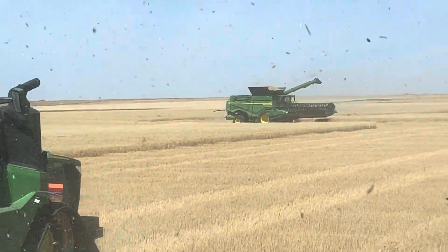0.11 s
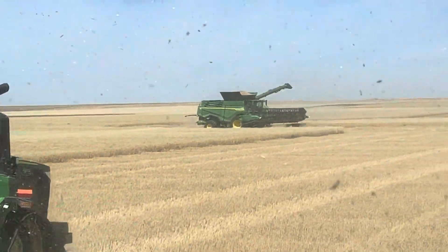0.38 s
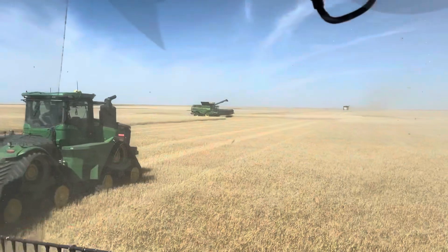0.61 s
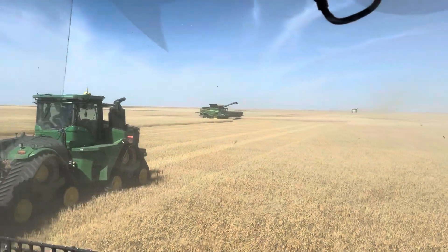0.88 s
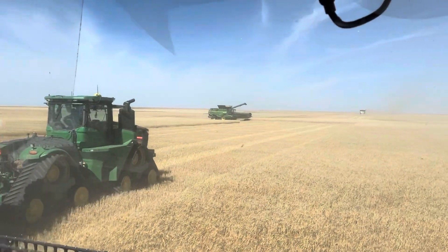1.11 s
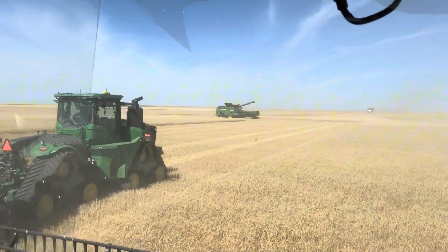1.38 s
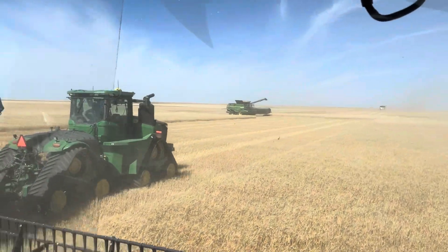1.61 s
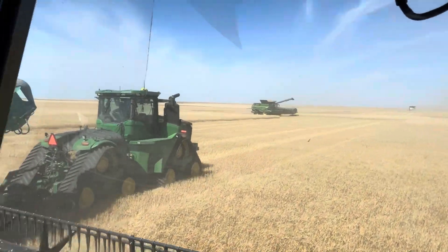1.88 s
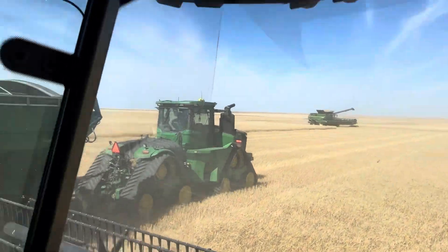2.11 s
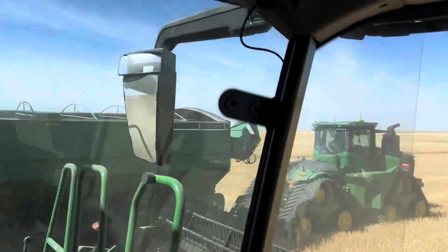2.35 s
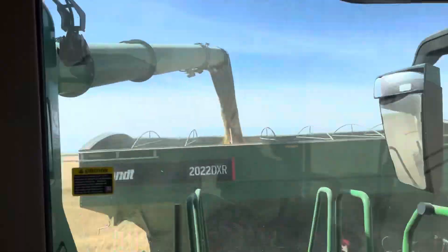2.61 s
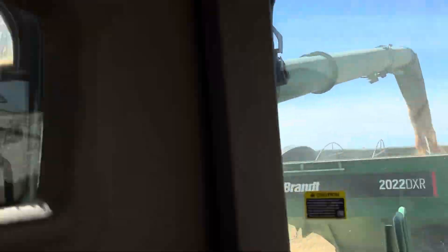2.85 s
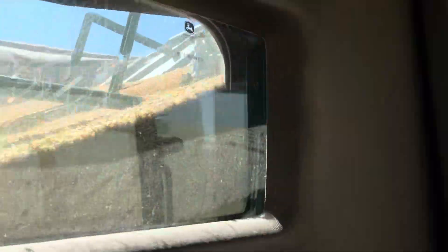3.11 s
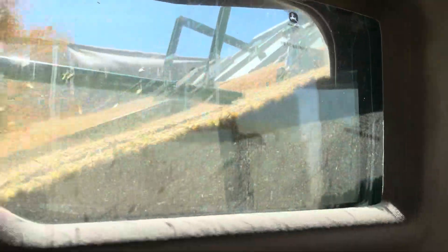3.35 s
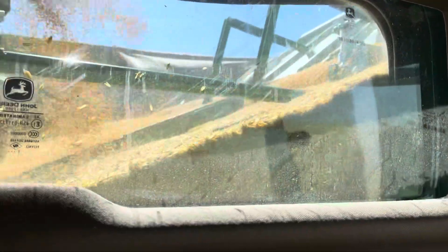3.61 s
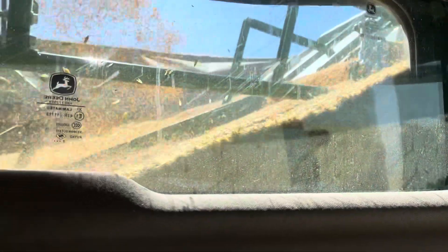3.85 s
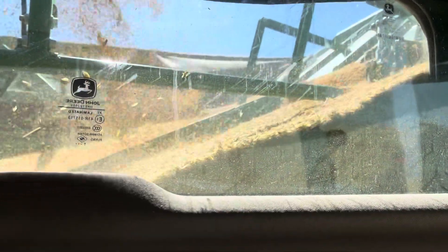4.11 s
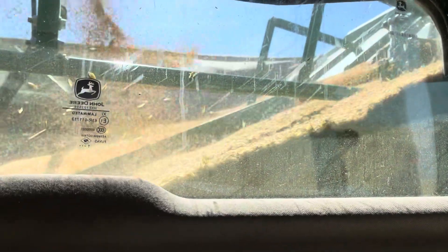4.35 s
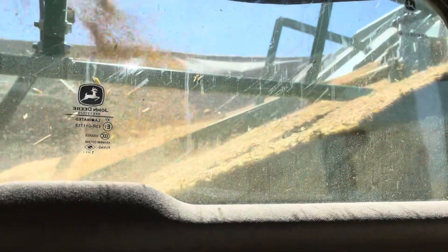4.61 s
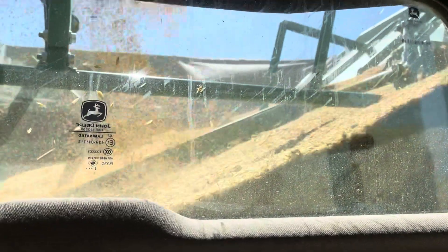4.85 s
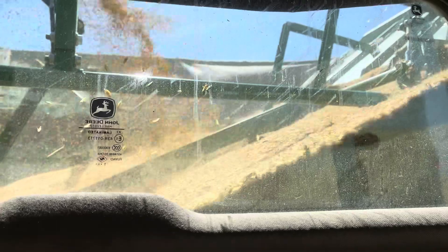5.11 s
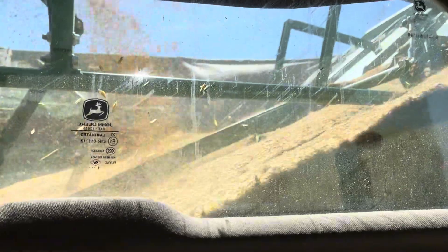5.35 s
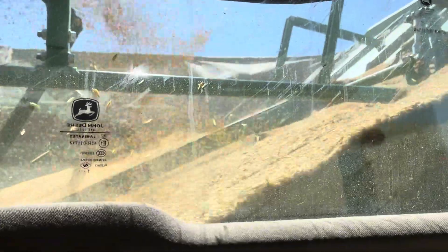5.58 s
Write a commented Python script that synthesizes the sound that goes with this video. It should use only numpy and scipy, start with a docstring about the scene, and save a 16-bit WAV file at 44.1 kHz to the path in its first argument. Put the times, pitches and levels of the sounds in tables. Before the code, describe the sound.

The interior of a closed harvester cab at constant engine speed, close and muffled, heard by a handheld stereo microphone. A deep steady hum near 95 Hz dips briefly about twice a second, among other low shaft and pump tones, faint wavering gear whine, dense threshing rumble and soft, dark hiss. At about 0.4 s there is one dry tick, stronger on the left. Light hand rubs follow around 0.5, 1.1, 1.5 and 1.8-1.9 s, with soft dull knocks at 1.5-1.6 and 1.8 s. From 2 to 3.2 s the microphone turns from windscreen to rear window: a hollow, airy rush swells at the side, rising in pitch, then subsides. The rumble settles into a boomier colour, its lows thinning for instants. At 3.9 s a tiny, high, stuttering squeak sounds on the right; at 4.2 s, a short rub and knocks. The drone continues unchanged to the end, about 5.7 s.

```python
"""Inside the closed cab of a harvester at constant engine speed, heard by a hand-held microphone pair.
From the start, steady sines (firing tone, shafts, pumps, gears) stand in noise bands shaped by the cab; the firing
tone dips about twice a second. Near 0.4 s the waveform steps once, a dry tick; then come rubs (short noise swells)
and soft knocks (dying sines). From 2 to 3.2 s the pair turns from windscreen to rear window past a rush of noise at
the side; from then on the lows thin briefly now and then. Near 3.9 s a squeak of tiny slips, near 4.2 s a rub and knocks."""
import sys
import numpy as np
from scipy import signal
from scipy.fft import rfft, irfft
from scipy.io import wavfile

SR = 44100
rng = np.random.default_rng(int(sys.argv[2]) if len(sys.argv) > 2 else 0)


def makeup_ratio(level_db):
    """Linear amplitude ratio for a level in decibels (20 dB per factor of ten)."""
    decades = np.asarray(level_db, float) / 20
    return 10 ** decades


def materialize(psi):
    """Save the field psi as 16-bit PCM at rate SR to the path in sys.argv[1].

    A 1-D psi becomes a single channel; in a 2-D psi each row is a channel.
    """
    bounded = np.clip(np.atleast_2d(psi).T, -1, 1)
    quanta = np.round(bounded * 32767).astype(np.int16)
    wavfile.write(sys.argv[1], SR, quanta)


N = 252252
T = np.arange(N) / SR   # time in s
JUMP_S = .4358   # when the waveform steps and the noise balance changes


def panned(pan_db):
    """Left and right gains, pan_db apart, of mean power 1."""
    left = makeup_ratio(pan_db / 2)
    return np.array([left, 1 / left]) / np.sqrt((left ** 2 + left ** -2) / 2)


def bump(centre_s, half_length_s):
    """A smooth rise to 1 and back, used for anything that comes and goes."""
    return np.exp(-((T - centre_s) / half_length_s) ** 2)


def drift(rate_hz):
    """Slow chance of spread 1: white noise twice through a one-pole low-pass, one value every 64 samples."""
    r = np.exp(-2 * np.pi * rate_hz * 64 / SR)
    white = rng.standard_normal(N // 64 + 3002)
    slow = signal.lfilter([1], [1, -2 * r, r * r], white)[3000:]   # the filter has settled by then
    return np.interp(np.arange(N) / 64, np.arange(len(slow)), slow / slow.std())


def turned(row, facing):
    """Blend a row's three values for ahead into its three for behind."""
    return [ahead + (behind - ahead) * facing for ahead, behind in zip(row[1:4], row[4:7])]


def halfway(facing):
    """How far the pair points sideways: 0 ahead and behind, 1 midway."""
    return 4 * facing * (1 - facing)


def gliding_noise(hz, width_hz):
    """Low-passed noise shifted up to a moving centre pitch; rms 1."""
    low = signal.butter(2, width_hz / 2, fs=SR, output="sos")
    a, b = signal.sosfilt(low, rng.standard_normal((2, N)))
    phase = 2 * np.pi * np.cumsum(hz) / SR
    noise = a * np.cos(phase) + b * np.sin(phase)
    return noise / noise.std()


def tone(hz, gains, lead):
    """A sine with left and right rms gains, its phase on the left ahead of the right by lead (rad)."""
    phase = 2 * np.pi * (hz * T + rng.random())
    return np.sqrt(2) * gains * np.sin([phase + lead / 2, phase - lead / 2])


def firing(facing):
    """The engine's firing tone in the standing wave of the cab; each dip takes the same amount from both sides."""
    # rows for ahead, sideways, behind: left_db (rms before dips), right_db (same), left_lead_rad
    standing_wave = [(-16.5, -22, -0.064), (-12, -13, 0.15), (-21, -14.5, 0.44)]
    # short dips of the tone: centre_s, half_length_s, taken_db (rms amplitude subtracted)
    dips = [(0.244, 0.071, -21.5), (0.746, 0.29, -25), (1.322, 0.13, -19), (1.988, 0.16, -26.5),
            (2.61, 0.14, -20), (3.255, 0.14, -23.5), (3.837, 0.25, -21.5), (4.272, 0.16, -28),
            (4.87, 0.14, -23.5), (5.295, 0.29, -21.5)]
    left_db, right_db, lead = (np.interp(facing, [0, .5, 1], column) for column in np.transpose(standing_wave))
    taken = sum(makeup_ratio(db) * bump(s, length) for s, length, db in dips)
    return tone(94.9, makeup_ratio(np.array([left_db, right_db])) - taken, lead)


def machinery(facing):
    """Constant engine speed keeps every tone's pitch; levels waver, with a faster waver added to high gear tones."""
    # shafts, pumps, gear mesh: pitch_hz, ahead: level_db (mid-waver rms), left_minus_right_db, left_lead_rad,
    # behind: the same three, sideways_db (added midway through the turn)
    tones = [(61.1, -31, 1, 0.3, -29, 2, -0.5, 0), (75.5, -37, 3, 0, -37, -2, 0.3, 0),
             (110.7, -35, 4, 0.4, -29.5, 1, -0.1, 2), (122.3, -41, 4, 0.4, -33, 1, -0.1, -2),
             (163.0, -42, -1, -0.1, -39, 3, 0.5, -2), (190.0, -39, 3, -0.0, -39, -2, 1.0, 1),
             (212.6, -43, 0, 0.2, -43, 1, 0.4, -10), (229, -42, 1, 0.2, -52, 0, 0.3, -8),
             (245.4, -37.5, 2, 0.3, -41, 0, 0.3, -10), (376.1, -39, 2, -0.2, -41, 9, 0.5, -2),
             (417.9, -40, -1, -0.3, -41, 2, 0.8, -3), (490.8, -54, 1, 0.0, -56, -1, 0.1, -2),
             (613.5, -58, -7, -2.8, -54, -5, -1.1, 0), (622.1, -48, -9, 1.7, -44, 4, -1.0, -3),
             (639.3, -65, 7, -1.0, -59, 11, -1.4, -9), (752.1, -55, -8, -0.2, -55, 5, 3.0, -9),
             (769.5, -56, 17, -2.1, -61, 4, -1.9, 0), (895.7, -62, 10, -0.3, -59, 7, -1.2, -8),
             (933.1, -61, 4, -2.4, -53, 3, 3.0, 4), (981.5, -65, 5, 2.1, -58, 10, 2.5, 2),
             (1227.8, -58, -4, 2.7, -63, -2, 0.8, 2), (1244.9, -57, 4, 1.7, -66, -4, 2.7, 0),
             (1686.5, -66, 1, -2.4, -64, -1, 2.4, -5), (1097, -64, -3, 0, -62, 0, 3, 2)]
    # tones that swell or fade for a moment: centre_s, half_length_s, pitch_hz (of the tone), added_db
    tone_swells = [(.43, .08, 229, 12), (.7, .35, 245.4, 4), (1.55, .1, 229, 10), (3.15, .35, 110.7, 8),
                   (3.15, .25, 122.3, 7), (4.2, .25, 122.3, 10), (4.5, .35, 110.7, 8),
                   (5.58, .15, 110.7, 7), (5.58, .2, 122.3, 10), (2.0, .6, 622.1, -9),
                   (2.85, .4, 376.1, -6), (2.5, .06, 1227.8, 7), (2.7, .1, 1244.9, 6), (2.47, .04, 1097, 8),
                   (2.16, .04, 1097, 7)]
    out = firing(facing)
    for row in tones:
        hz, sideways_db = row[0], row[7]
        level_db, pan_db, lead = turned(row, facing)
        gear_db = 3 * np.clip((hz - 650) / 400, 0, 1)
        surge_db = 1.8 if 100 < hz < 450 else 1.1   # low tones surge more
        waver_db = surge_db * drift(3.3) + gear_db * drift(6.8)
        waver_db -= np.log(10) / 20 * gear_db ** 2   # offsets the mean power that the gear waver adds
        swell_db = sum(db * bump(s, length) for s, length, pitch, db in tone_swells if pitch == hz)
        level_db = level_db + swell_db + sideways_db * halfway(facing) + waver_db
        out += tone(hz, makeup_ratio(level_db) * panned(pan_db), lead)
    return out


def cab_noise(facing):
    """Overlapping bands of noise, one a table row, each with its level, side, likeness and flutter."""
    # threshing rumble through the cab: pitch_hz, ahead: level_db (per Hz, before swells and flutter),
    # left_minus_right_db, likeness (of the two sides, -1 to 1), behind: the same three
    rumble = [(25, -57.5, 1.5, 0.96, -60.5, 3.5, 0.91), (38.3, -54, -1, 0.98, -42.5, 0.5, 0.98),
              (50.4, -40.5, -2.5, 0.93, -50, 0, 0.84), (61.3, -43, 3, 0.85, -44, -2, 0.73),
              (80, -45, 1, 0.94, -44, 5.5, 1), (90.4, -41.5, 6.5, 0.96, -58, -6.5, 0.93),
              (100.1, -37.5, 0, 1, -40.5, 2.5, 0.63), (108.2, -47.5, -1, 0.84, -33.5, 3, 0.91),
              (129, -51, 6, 0.84, -44, -4.5, 1), (152.7, -51, 5, 0.5, -44.5, 4.5, 0.82),
              (187.8, -54.5, 2, 0.96, -48, 3.5, 0.77), (231.5, -48.5, 0, 1, -50, -1.5, 0.7),
              (294.6, -57, 3, 0.73, -57.5, 3.5, 0.74), (385, -54.5, 1.5, 0.91, -59.5, -2.5, 0.32),
              (454.5, -57.5, -0.5, 0.55, -60.5, 0, 0.62), (550, -66, 3, 0.99, -63, 8, 0.39)]
    # hiss above the rumble, in the top rows often nearly alike or opposite on the two sides: same columns and units
    hiss = [(695, -69, -0.5, 0.31, -69.5, -2.5, -0.56), (843, -71, 1.5, 0.26, -68, 1.5, -0.71),
            (1035, -71, 6, 0.22, -73.5, 2, -0.38), (1273, -74, 0.5, -0.35, -73, -3, -0.28),
            (1472, -74.5, -0.5, -0.49, -76, -5, -0.39), (1730, -77, 3.5, -0.16, -77, -1.5, -0.42),
            (2110, -81.5, 0.5, 0.7, -80.5, -1.5, 0.46), (2470, -83.5, 0, 0.78, -85.5, -2, 0.77),
            (3490, -87, -3, 0.73, -90.5, -1.5, 0.32), (4280, -88.5, -2.5, 0.68, -90, -7.5, 0.28),
            (5020, -93, -4, 0.78, -92, -8.5, 0.059), (5580, -92.5, -0.5, -0.55, -93.5, -5.5, -0.27),
            (7000, -94.5, -4, -0.71, -98.5, 1, -0.5), (7730, -95.5, 3.5, 0.89, -98, 0, 0.92),
            (10140, -99, -4, 0.94, -101, 0.5, 0.74), (10720, -100, 1, 0.37, -103, -0.5, 0.81),
            (11800, -101, -4, -0.99, -104, -1.5, -1.0), (13500, -106, 1, -1.0, -111, -1.5, -0.9),
            (14500, -108, 0.5, 0.81, -115, -5, 0.78), (15600, -114, -0.5, 0.77, -114, 0.5, 0.93)]
    # phase by which noise is ahead on the left: pitch_hz, lead_rad
    noise_lead = [(500, 0.1), (700, -0.9), (900, 0.2), (1250, -1), (1900, -0.3), (2100, 0.3), (2900, -0.8),
                  (5000, -0.9), (5500, -0.4), (7200, 0.4), (7600, 0)]
    # dB added to boom, rumble, low, middle and high hiss: before the jump, then midway through the turn
    before_jump_db = [2.5, 0, -2, 1.5, -1]
    sideways_db = [1.3, -2.5, 0.4, 0.15, 1.3]
    split_hz = [140, 620, 1700, 3800]   # borders of those five parts
    flutter_db = [0.23, 0.93, 0.95, 1.0, 1.0]   # scale of the random level changes in each part

    table = np.array(rumble + hiss)
    log_hz = np.log(np.fft.rfftfreq(N, 1 / SR) + 1)
    swells = np.outer(before_jump_db, T < JUMP_S) + np.outer(sideways_db, halfway(facing))
    shared = drift(8.0)
    out = np.zeros((2, N))
    for k, row in enumerate(table):
        # neighbours cross over in power
        share = np.interp(log_hz, np.log(table[:, 0]), np.arange(len(table)) == k)
        white = rng.standard_normal((2, len(log_hz))) + 1j * rng.standard_normal((2, len(log_hz)))
        mid, side = irfft(white * np.sqrt(share * N * SR / 8), N)
        level_db, pan_db, alike = turned(row, facing)
        alike = np.clip(alike, -1, 1)
        part = np.searchsorted(split_hz, row[0])
        level_db = level_db + swells[part] + flutter_db[part] * (0.45 * shared + drift(10.2))
        mid, side = np.sqrt(1 + alike) * mid, np.sqrt(1 - alike) * side
        out += makeup_ratio(level_db) * panned(pan_db) * [mid + side, mid - side]
    lead_hz, lead_rad = np.transpose(noise_lead)
    lead = np.interp(log_hz, np.log(lead_hz), lead_rad)
    return irfft(rfft(out) * np.exp(.5j * np.outer([1, -1], lead)), N)


def panels(facing):
    """Panels and glass ring on the noise: narrow bands that change with facing; the sides grow unlike with pitch."""
    # ringing parts: pitch_hz, width_hz, ahead_db (rms), sideways_db (rms), behind_db (rms), left_minus_right_db
    ringing = [(229, 20, -39.5, -54.5, -43.5, -1), (292, 36, -45, -53.5, -57.5, -4),
               (398, 22, -43, -46.5, -45.5, 8.5), (536.5, 30, -49, -57.5, -48.5, -1.5),
               (605, 26, -51.5, -61, -60, -3), (764, 44, -53.5, -60, -61.5, 5),
               (932, 41, -53, -58.5, -57.5, -3.5), (1090, 45, -61, -54, -64, -4.5),
               (1234, 44, -59, -48.5, -68.5, -3), (1328, 15, -67, -58.5, -71, -7),
               (1454, 42, -69, -58, -57, -6.5), (2204, 53, -59.5, -63, -71, -1)]
    # stages of the turn (0 to 1): ahead, sideways from, sideways to, behind
    stages = [.08, .3, .72, .92]
    out = np.zeros((2, N))
    for hz, width_hz, ahead_db, sideways_db, behind_db, pan_db in ringing:
        level_db = np.interp(facing, stages, [ahead_db, sideways_db, sideways_db, behind_db])
        mid, side = (gliding_noise(np.full(N, hz), width_hz) for k in range(2))
        apart = min(hz / 900, 1)
        sides = np.array([mid + apart * side, mid - apart * side]) / np.hypot(1, apart)
        out += makeup_ratio(level_db) * panned(pan_db)[:, None] * sides
    return out


def cancelled(noise, facing):
    """The cab cancels noise in narrow valleys between its resonances; their depth changes as the pair turns."""
    # valleys: pitch_hz, half_width_hz, ahead_db, behind_db (above 0 counts as no valley)
    valleys = [(85, 5, -2, 0.5), (202, 3.4, 0.5, 0), (269, 7.4, -3, 3), (360, 6.4, -5, -0.5),
               (457, 35, -2, -1), (585, 11, -7, -2)]
    hz, spectrum = np.fft.rfftfreq(N, 1 / SR), rfft(noise)

    def carved(column):
        cut_db = sum(np.minimum(row[column], 0) * np.exp(-((hz - row[0]) / row[1]) ** 2) for row in valleys)
        return irfft(spectrum * makeup_ratio(cut_db), N)

    ahead, behind = carved(2), carved(3)
    return ahead + (behind - ahead) * facing


def side_rush(facing):
    """One noise resonance, partly shared by both sides, rises in pitch with the turn and swells at the side window."""
    hz = np.interp(facing, [0.07, .65], [1084, 1468])
    start_s, attack_s, hold_s, release_s = 2.02, .4, 0.45, .22
    full_db, range_db = -52.5, 14.5   # rms of the shared part at full swell; how far it lies lower otherwise
    corners = start_s + np.cumsum([0, attack_s, hold_s, release_s])
    level_db = full_db + np.interp(T, corners, [-range_db, 0, 0, -range_db])
    both, left, right = (gliding_noise(hz, width_hz=100) for k in range(3))
    return makeup_ratio(level_db) * np.array([both + 0.78 * left, both + 0.67 * right])


def lows_thinned(sound):
    """The lows thin briefly, as when low tones and rumble happen to cancel: a level dip below about 260 Hz."""
    # moments of thin lows: centre_s, half_length_s, change_db (of the lows)
    thin_moments = [(2.018, .014, -12), (2.256, .012, -12), (2.704, .011, -24), (3.29, .012, -9),
                    (3.67, .012, -10), (4.663, .011, -22)]
    lows = signal.sosfiltfilt(signal.butter(2, 260, fs=SR, output="sos"), sound)
    change_db = sum(db * bump(s, length) for s, length, db in thin_moments)
    return sound + lows * (makeup_ratio(change_db) - 1)


def rubs():
    """The hand rubs near the microphones: short swells of noise in one broad resonance that rises."""
    # rubs: centre_s, half_length_s, pitch_hz (middle of the rise), width_hz, level_db (rms at full swell, before panning)
    hand_rubs = [(.5, .03, 950, 450, -48), (1.07, .012, 1250, 450, -46), (1.5, .03, 1000, 350, -43),
                 (1.58, .055, 2050, 380, -48.5), (1.8, .03, 850, 300, -44), (1.9, .015, 2150, 200, -48),
                 (4.24, .015, 800, 500, -43)]
    out = np.zeros(N)
    for s, length, mid_hz, width_hz, level_db in hand_rubs:
        hz = mid_hz * (1 + .05 * np.clip((T - s) / length, -1, 1))   # from 5 % below to 5 % above
        out += makeup_ratio(level_db) * gliding_noise(hz, width_hz) * bump(s, length)
    return np.outer(panned(-10), out)


def knocks():
    """Soft knocks on the housing: two dull modes, struck together, that die within a few cycles."""
    # knocks: start_s, pitch_hz (first mode), level_db (each mode, before rise, fade and panning), ring_s (fade to 1/e)
    housing_knocks = [(1.807, 820, -34, .007), (4.2305, 720, -29, .004), (4.227, 1200, -37, .003),
                      (4.208, 1150, -40, .004), (1.517, 1000, -35, .004), (1.528, 950, -33, .007),
                      (1.617, 1750, -44, .005)]
    overtone, rise_s = 1.33, .0005   # second mode as a multiple of the first
    out = np.zeros(N)
    for s, hz, level_db, ring_s in housing_knocks:
        since = np.maximum(T - s, 0)
        modes = np.sin(2 * np.pi * hz * since) + np.sin(2 * np.pi * hz * overtone * since)
        out += makeup_ratio(level_db) * (1 - np.exp(-since / rise_s)) * np.exp(-since / ring_s) * modes
    return np.outer(panned(-5), out)


def squeak():
    """A squeak on the right: slips of a few high cycles swell and fade in short uneven runs, each run a little lower."""
    # runs of slips: start_s, slips (count), level_db (typical slip peak, before panning)
    slip_runs = [(3.885, 1, -52), (3.9, 3, -45), (3.9235, 5, -42), (3.9425, 3, -43)]
    gap_s, uneven, spread_db = .0033, .1, 2   # between slips; timing spread as a share of the gap; level spread
    first_hz, spread_hz, fall_hz_per_s = 5780, 50, 2500
    rise_s, fade_s = .0008, .002
    out = np.zeros(N)
    for start, slips, level_db in slip_runs:
        run_hz = first_hz - fall_hz_per_s * (start - slip_runs[0][0])
        for k, (late, high, loud, turn) in enumerate(rng.standard_normal((int(slips), 4))):
            since = T - start - gap_s * (k + uneven * late)
            swell = np.exp(-(since / np.where(since < 0, rise_s, fade_s)) ** 2)
            cycles = (run_hz + spread_hz * high) * since + turn
            out += makeup_ratio(level_db + spread_db * loud) * swell * np.sin(2 * np.pi * cycles)
    return np.outer(panned(-14), out)


def jump():
    """The waveform steps down once and fades back at once: one dry tick."""
    heights, fade_s = [-0.21, -0.082], 0.0027   # left and right
    since = T - JUMP_S
    return np.outer(heights, (since >= 0) * np.exp(-np.abs(since) / fade_s))


def pointing():
    """Where the microphone pair points: 0 windscreen to 1 rear window."""
    # turn of the pair: time_s, facing (0 to 1)
    turn_path = [(0, 0.035), (2.0, 0.12), (2.4, 0.34), (2.8, 0.82), (3.2, 0.93), (5.72, 0.93)]
    times, stages = np.transpose(turn_path)
    return np.clip(np.interp(T, times, stages), 0, 1)


def scene():
    """All sources as the turning pair hears them."""
    facing = pointing()
    noise = cancelled(cab_noise(facing) + panels(facing), facing) + side_rush(facing)
    steady = lows_thinned(machinery(facing) + noise)
    return steady + rubs() + knocks() + squeak() + jump()


def roll_off(x):
    """The treble ends steeply here."""
    return signal.sosfilt(signal.butter(12, 15760, fs=SR, output="sos"), x)


def record(dry):
    """A high-pass at 37 Hz cuts the deepest lows of the finished mix."""
    low_cut = signal.butter(4, 37, "high", fs=SR, output="sos")
    return roll_off(signal.sosfilt(low_cut, dry))


dry = scene()
out = record(dry)
materialize(out)
```